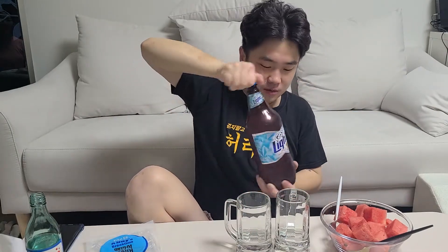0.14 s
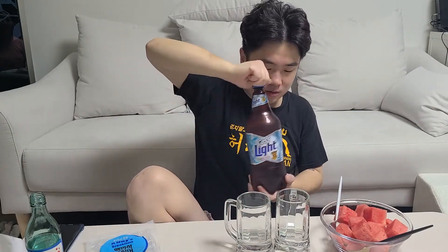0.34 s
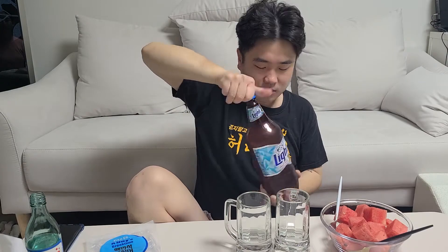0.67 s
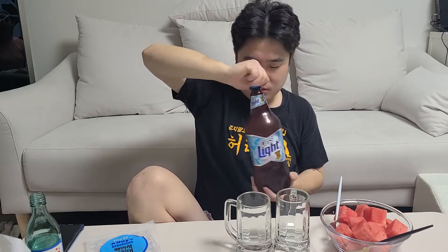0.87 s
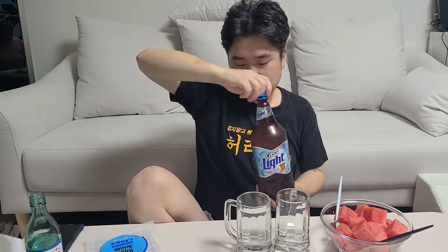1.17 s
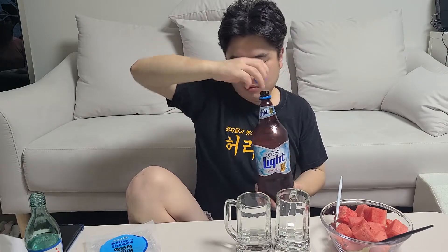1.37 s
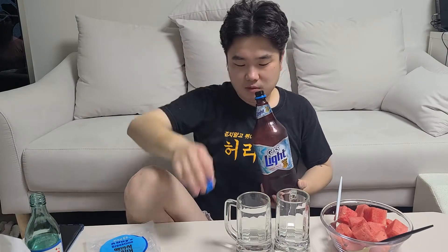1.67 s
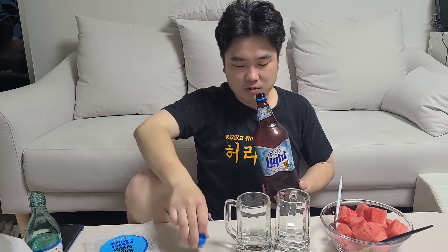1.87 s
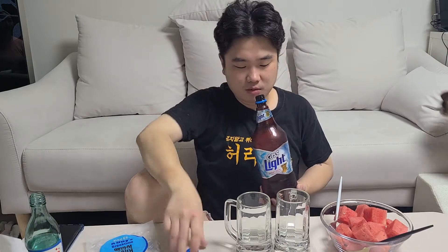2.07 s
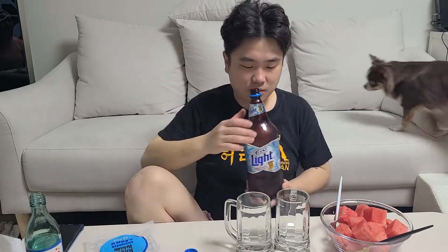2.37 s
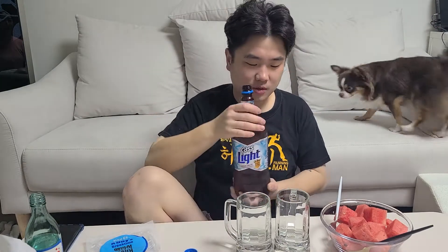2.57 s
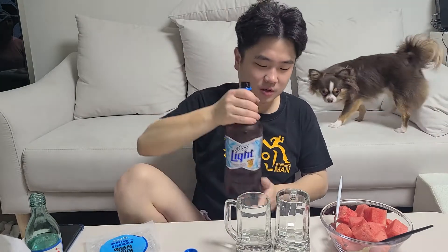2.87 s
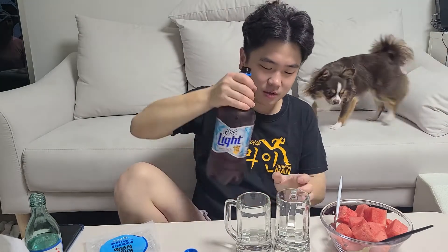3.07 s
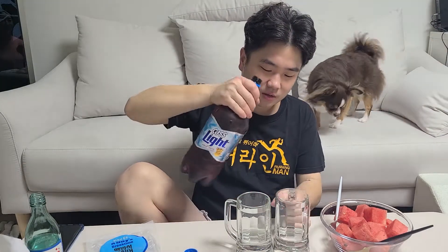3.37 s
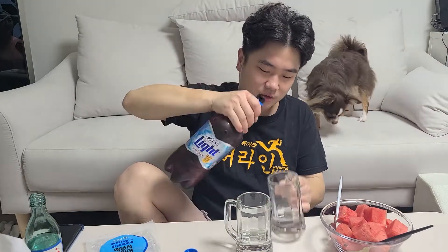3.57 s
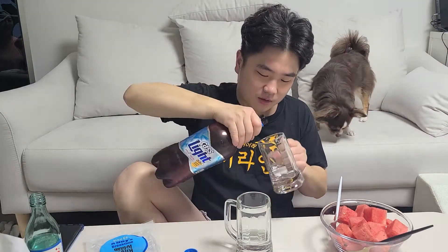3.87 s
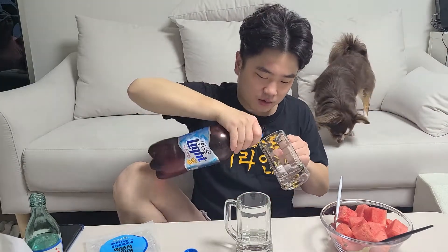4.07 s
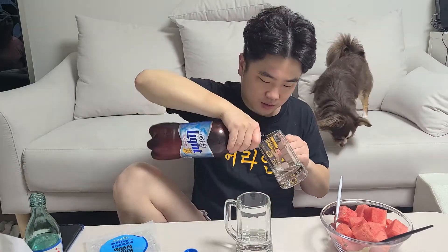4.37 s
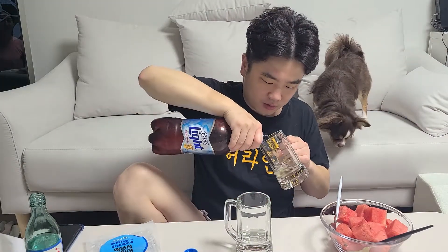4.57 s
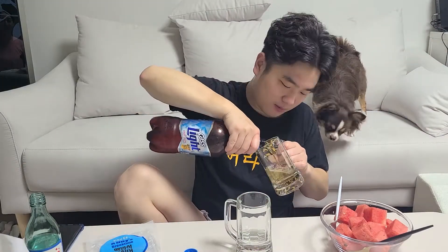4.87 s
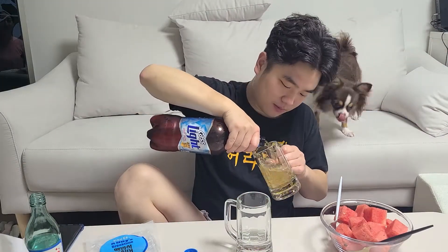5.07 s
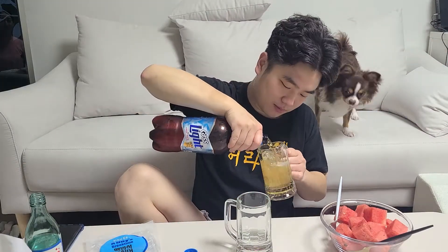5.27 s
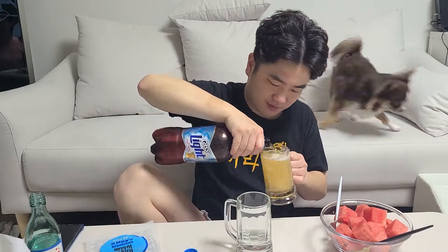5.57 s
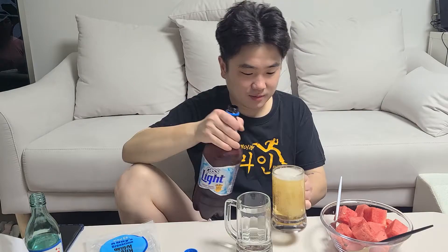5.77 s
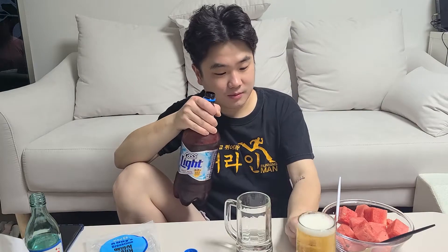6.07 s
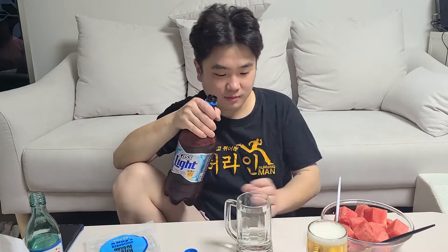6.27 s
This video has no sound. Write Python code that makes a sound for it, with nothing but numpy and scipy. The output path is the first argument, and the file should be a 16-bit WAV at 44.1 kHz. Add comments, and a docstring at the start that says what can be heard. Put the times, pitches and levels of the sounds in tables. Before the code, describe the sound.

Sharp gas hiss and pop from a plastic bottle, snapping ring, tumbling cap, quick fast-forward pouring, and a heavy glass set down in a living room.

```python
"""Gas leaks, pops and hisses as a big plastic beer bottle is twisted open: noise shaped by jet and thread gaps.
The seal and the dropped cap are clicks with a dense ring; beer plops, then runs down a tilted glass mug as
rising sine bubbles. The neck touches the mug, fingers rub, a body shifts on a sofa, and a mug is set down.
Ventilation noise and wavering tones hum behind it all. From the pour on, bubbles, body thuds, ventilation and
room echoes play in fast-forward."""
import sys
import numpy as np
from scipy import signal
from scipy.fft import rfft, irfft, next_fast_len
from scipy.io import wavfile
from scipy.ndimage import map_coordinates

SR = 44100
rng = np.random.default_rng(int(sys.argv[2]) if len(sys.argv) > 2 else 0)


def wav_out(sig):
    """Save sig, one row per channel (or a flat mono array), as 16-bit PCM at SR to the path in sys.argv[1]."""
    wavfile.write(sys.argv[1], SR, np.round(np.clip(np.atleast_2d(sig).T, -1, 1) * 32767).astype(np.int16))


N = 283563

FAST_S, SPEEDUP = 4.814, 4  # when fast-forward begins, and how many times faster it runs
TOP_HZ = 16050  # upper band limit

LEAK_S, POP_S = 0.13, 0.2148  # the seal starts to leak, then lets go
LEAK_DB, LEAK_GROWS_DB_PER_S, LEAK_ATTACK_S = -52, 224, 0.008  # the leak widens as the cap turns
JET_DB, JET_SAGS_DB_PER_S = -17, 80  # the full jet weakens as the pressure sinks
JET_HOLD_S, JET_FALLS_DB_PER_S = 0.052, 749.5  # then the pressure is spent: this much extra fall
SEEP_DB, SEEP_FALLS_DB_PER_S = -38, 112  # the last gas seeping through the thread


def gas_flow(t):
    """Flow in dB: a growing leak, then a jet that sags and collapses, and a slow seep with it and after it."""
    leaking = np.maximum(t - LEAK_S, 0)
    since_pop = t - POP_S
    leak = amp(LEAK_DB + LEAK_GROWS_DB_PER_S * leaking) * (1 - np.exp(-leaking / LEAK_ATTACK_S))
    collapse_db = JET_FALLS_DB_PER_S * np.maximum(since_pop - JET_HOLD_S, 0)
    jet = amp(JET_DB - JET_SAGS_DB_PER_S * since_pop - collapse_db)
    seep = amp(SEEP_DB - SEEP_FALLS_DB_PER_S * since_pop)
    return 20 * np.log10(np.where(since_pop < 0, leak, jet + seep) + 1e-9)


# colour of the rushing gas: [pitch_hz, relative level_db per Hz]
JET_COLOUR = [(240, -49.5), (400, -24.5), (865, -25.5), (964, -25), (1330, -20), (1650, -19.5), (2220, -14),
              (3420, -22), (4310, -11), (6740, -3.5), (7280, -12), (9040, -6.5), (11600, 0.5), (16000, -10)]
# resonances of the thread gaps: [pitch_hz, width_hz, relative level_db]
THREAD_GAPS = [(4800, 1380, -8.5), (7140, 206.4, -4.5), (7470, 450, -2.5), (11165, 280, -2.5),
               (11760, 200, -2.5), (14000, 360, -3)]


def gas_jet(whistle_db=-4, spit_db=2.5):
    """Turbulent rush plus whistling thread gaps, spitting at random around the flow of escaping gas."""
    out, t = np.zeros((2, N)), seconds(1)

    def gaps(hz):
        return sum(amp(db) * 1j * hz * width / (centre ** 2 - hz ** 2 + 1j * hz * width)
                   for centre, width, db in THREAD_GAPS)

    rush = filtered(rng.standard_normal(len(t)), lambda hz: amp(along(JET_COLOUR, hz)))
    whistle = filtered(rng.standard_normal(len(t)), gaps)
    hiss = unit(unit(rush) + amp(whistle_db) * unit(whistle))
    level_db = gas_flow(t) + spit_db * wobble(len(t), 400)
    add(out, 0, amp(level_db) * hiss, wet_db=3, near_db=2.0)
    return out * amp(np.array([[0.27], [-0.27]]))  # the jet points a little to the left


# colour of the seal letting go: [pitch_hz, relative level_db per Hz]
POP_COLOUR = [(30, -48.5), (100, -25.5), (200, -7.5), (300, 3), (600, -3.5), (850, -5.5), (1300, 0),
              (4000, -2.5), (9000, -10.5), (16000, -19.5)]
# air modes in the bottle: [pitch_hz, relative level_db, t60_s]
BOTTLE_AIR = [(301, -1.5, 0.12), (390, -7, 0.098), (546, -3.5, 0.064), (1070, 0, 0.04), (2368, -5, 0.087)]


def seal_pop(pop_db=-22, neck_db=-29.0):
    """The seal bursts as a sharp click and sets the air in the bottle ringing."""
    out = np.zeros((2, N))
    add(out, POP_S, amp(pop_db) * click(POP_COLOUR, rattle=0.88, t60=0.014), wet_db=-2.5, near_db=-4.5)
    add(out, POP_S, amp(neck_db) * ringing(BOTTLE_AIR), wet_db=-15.5, near_db=-2.5)
    return out


# the cap's ring snaps: [start_s, level_db, brightness_db per octave]
RING_SNAPS = [(.7283, -23, 5)]
# colour of the snapping ring before tilt: [pitch_hz, relative level_db per Hz]
RING_COLOUR = [(100, -34), (300, -7.5), (800, -6), (1150, 1.5), (1900, -6), (3000, -1.5), (5000, -16),
               (6200, -16.5), (8000, -27), (11000, -29), (16000, -36)]


def seal_snap():
    """The plastic ring breaks in a bright crack with a weaker, duller echo contact."""
    return contacts(RING_SNAPS, RING_COLOUR, rattle=0.88, t60=0.015, wet_db=-2.5, left_lag=4,
                    gap_s=0.0012, loss_db=9.5, dull_db=8, count=2)


# the cap lands and tumbles on the table: [start_s, level_db, brightness_db per octave]
CAP_DROPS = [(1.9518, -25, 2.5), (1.9635, -27.5, 3.5), (2.030, -37, -4.5), (2.0378, -35.5, 0),
             (2.0815, -43, -5.5), (2.095, -40, -3.5)]
# colour of the cap before tilt: [pitch_hz, relative level_db per Hz]
CAP_COLOUR = [(200, -34), (500, -9.5), (700, -12.5), (950, -3), (1300, -6), (2400, 2), (3200, -3.5),
              (4500, 0.5), (6500, -9.5), (9000, -15.5), (11500, -16.5), (16000, -31)]


def cap_drop():
    """The light cap strikes the table again and again, chattering at each landing."""
    return contacts(CAP_DROPS, CAP_COLOUR, rattle=0.52, t60=0.013, wet_db=-2.5, left_lag=1,
                    gap_s=0.0105, loss_db=8, dull_db=5.5, count=3)


def contacts(rows, spectrum, rattle, t60, wet_db, left_lag, gap_s, loss_db, dull_db, count):
    """Blows on one body; each chatters in count contacts, gap_s apart, every one weaker and duller."""
    out = np.zeros((2, N))
    for start_s, level_db, brightness in rows:
        for k in range(count):
            tilt = brightness - k * dull_db  # dB per octave around 3 kHz
            colour = [(hz, level + tilt * np.log2(hz / 3000)) for hz, level in spectrum]
            hit = amp(level_db - k * loss_db) * click(colour, rattle, t60)
            add(out, start_s + k * gap_s, hit, wet_db, near_db=-4.5, left_lag=left_lag)
    return out


# the beer sloshes and frees air bubbles: [start_s, level_db before plop_db, pitch_hz at normal speed]
SLOSHES = [(0.016, -32, 1120), (0.068, -37.5, 1210), (1.336, -42, 1156), (1.888, -36.5, 1185),
           (2.182, -42.5, 1210), (2.526, -34.5, 1020), (4.017, -37.5, 1024), (4.535, -38, 1282),
           (5.2091, -32, 1150), (5.944, -27, 1130), (5.991, -26, 1240), (6.093, -34, 1100),
           (6.2, -27, 1170)]


def sloshes(plop_db=-4, gap_s=0.002, count=6):
    """Each slosh frees a quick cluster of bubbles, in random order of size around its main pitch."""
    out = np.zeros((2, N))
    for start_s, level_db, pitch_hz in SLOSHES:
        speed = speed_at(start_s)
        cluster = np.zeros(SR // 4)
        for k, detune in enumerate(rng.permutation(np.linspace(-0.2, 0.2, count))):
            plop = bubble(pitch_hz * speed * np.exp(detune), speed, life=0.022, rise=3.985)
            first = round(k * gap_s / speed * SR)
            cluster[first:first + len(plop)] += amp(level_db + plop_db - k) * plop  # 1 dB weaker each time
        add(out, start_s, cluster, wet_db=1)
    return out


# the first beer to land traps two large bubbles: [start_s, level_db, pitch_hz at normal speed]
LARGE_BUBBLES = [(4.866, -33, 796), (4.89, -39, 890)]


def stream(length_s=0.8, bubble_db=-47, pitch_hz=1100, spread=0.5, scatter_db=2, count=110):
    """Two gulps, and beer sliding down the tilted mug, folding in small bubbles of many sizes."""
    out, trickle = np.zeros((2, N)), np.zeros(2 * SR)
    for start_s, level_db, gulp_hz in LARGE_BUBBLES:
        gulp = bubble(gulp_hz * SPEEDUP, SPEEDUP, life=0.096, rise=2.5)
        add(out, start_s, amp(level_db) * gulp, wet_db=4)
    starts = rng.uniform(0, length_s, count)
    for start_s, (size, strength) in zip(starts, rng.standard_normal((count, 2))):
        fast_hz = min(pitch_hz * np.exp(spread * size) * SPEEDUP, TOP_HZ)
        plop = bubble(fast_hz, SPEEDUP, life=0.02, rise=4)
        first = round(start_s * SR)
        level_db = bubble_db + scatter_db * np.clip(strength, -2, 2)
        trickle[first:first + len(plop)] += amp(level_db) * plop
    add(out, FAST_S, trickle, wet_db=8.5)
    return out


def bubble(hz, speed, life, rise):
    """A sine swells softly, climbs by 2 * rise of hz per second and falls 60 dB in life (normal-speed time)."""
    t = seconds(life * 2 / speed) * speed
    envelope = amp(-60 * t / life) * (1 - np.exp(-t / 0.0015))
    return envelope * np.sin(2 * np.pi * hz / speed * t * (1 + rise * (t - life / 4)))


# the bottle neck touches the mug: [start_s, knock level_db, ring level_db]
NECK_TOUCHES = [(4.2983, -40, -71), (4.5656, -49, -45), (4.5962, -40.5, -52)]
# colour of the knock: [pitch_hz, relative level_db per Hz]
KNOCK_COLOUR = [(400, 2), (1000, -8), (1800, 12), (2400, -8), (3000, 2.5), (4000, -21), (7500, -22.5),
                (8600, -14.5), (9500, -35), (16000, -36)]
# modes of the glass: [pitch_hz, relative level_db, t60_s]
GLASS_MODES = [(3170, 5, 0.066), (3300, -15, 0.052), (8500, -22, .04)]


def mug_rim():
    """The plastic neck gives a dull knock and makes the glass ring."""
    out = np.zeros((2, N))
    for start_s, knock_db, ring_db in NECK_TOUCHES:
        add(out, start_s, amp(knock_db) * click(KNOCK_COLOUR, rattle=0.92, t60=0.014), wet_db=-1)
        add(out, start_s, amp(ring_db) * ringing(GLASS_MODES), wet_db=-5.0)
    return out


# the full mug is set down and rocks: [start_s, level_db, brightness_db per octave]
MUG_KNOCKS = [(6.0373, -26, 1), (6.0396, -28.5, 1.5), (6.064, -37.5, -1), (6.1246, -37.5, 2),
              (6.128, -39.5, -1)]
# colour of mug on table before tilt: [pitch_hz, relative level_db per Hz]
TABLE_COLOUR = [(240, -40), (450, -15), (700, -0.5), (1000, -17.5), (1400, -2.5), (2100, -2), (2900, -7),
                (3300, -11), (4600, -15), (7400, -27), (11000, -34), (16000, -45)]


def mug_set_down():
    """The heavy mug knocks on the table, each blow followed by a weaker, duller contact."""
    return contacts(MUG_KNOCKS, TABLE_COLOUR, rattle=0.81, t60=0.0094, wet_db=6.0, left_lag=1,
                    gap_s=0.004, loss_db=8, dull_db=5.5, count=2)


# light ticks of the thread and of the bottle's flexing wall, and two more ticks during the pour: [start_s,
# level_db, centre pitch_hz]
LIGHT_TICKS = [(0.9317, -52, 3800), (1.0804, -45, 2100), (1.199, -50.5, 2450), (1.396, -61, 12500),
               (1.4626, -47, 8000), (1.7365, -47.5, 7300), (5.08, -48, 3200), (5.294, -43, 5800)]


def light_ticks(t60=0.027, octaves=0.39):
    """Each tick is a short burst of banded noise, which dies sooner in fast-forward."""
    out, t = np.zeros((2, N)), seconds(0.03)
    for start_s, level_db, centre_hz in LIGHT_TICKS:
        noise = filtered(rng.standard_normal(len(t)), lambda hz: band(hz, centre_hz, octaves))
        decay = amp(-60 * t * np.sqrt(speed_at(start_s)) / t60)
        add(out, start_s, amp(level_db) * blow(noise * decay), wet_db=-4)
    return out


# thread and fingers rub on plastic and glass; the low strokes after 5.6 s are a body's rustle
# in fast-forward: [start_s, length_s, level_db, centre pitch_hz]
RUBS_AND_RUSTLES = [(1.392, 0.044, -66, 11000), (1.465, .028, -56, 8300), (1.572, 0.065, -61.5, 7500),
                    (1.716, .042, -65, 10000), (2.561, 0.074, -64.5, 6940), (3.116, 0.033, -64, 7500),
                    (3.79, .04, -68, 3900), (3.978, 0.043, -74, 7500), (4.726, 0.027, -64.5, 7700),
                    (5.692, .022, -49, 1200), (5.756, 0.019, -46, 7900), (5.763, .02, -45.5, 750),
                    (6.386, .053, -53.5, 7000)]


def rubs_and_rustles(octaves=1.0):
    """Friction of thread and fingers, and of a rustling body, gives short, grainy strokes of banded noise."""
    out = np.zeros((2, N))
    for start_s, length_s, level_db, centre_hz in RUBS_AND_RUSTLES:
        rub = stroke(length_s, lambda hz: band(hz, centre_hz, octaves), grain_db=5)
        add(out, start_s, amp(level_db) * rub, wet_db=0)
    return out


# colour of the mug's base on the table top: [pitch_hz, relative level_db per Hz]
SCRAPE_COLOUR = [(200, -10), (700, 6), (1200, 1), (2000, -3), (3700, -3), (6500, -6.5), (9000, -23),
                 (16000, -25)]


def mug_slide(start_s=3.325, length_s=0.11, level_db=-52):
    """The empty mug is dragged off the table in one grainy scrape."""
    out = np.zeros((2, N))
    scrape = stroke(length_s, lambda hz: amp(along(SCRAPE_COLOUR, hz)), grain_db=4.0)
    add(out, start_s, amp(level_db) * scrape, wet_db=-4.5)
    return out


def stroke(length, colour, grain_db):
    """Grainy friction that swells and fades over its length."""
    t = seconds(length)
    slips = rng.standard_normal(len(t)) * amp(grain_db * wobble(len(t), 249))
    return unit(filtered(slips, colour)) * np.sin(np.pi * t / length)


BUMP_HZ, CLOTH_HZ, CLOTH_OCTAVES = 49.2, 110, 1.16  # frame's thud and cloth's rustle, at normal speed
# the body shifts against the sofa: [middle_s, level_db]
BODY_SHIFTS = [(1.821, -50), (2.6, -51), (2.93, -45.5), (3.29, -48.5), (3.38, -51), (5.582, -45),
               (5.657, -44.5), (5.705, -47), (5.767, -50.5), (6.34, -47.5)]


def sofa(bump_s=0.12, cloth_db=-5):
    """Each shift of the body gives a soft low thud and a dull rustle of cloth."""
    out = np.zeros((2, N))
    for middle_s, level_db in BODY_SHIFTS:
        speed = speed_at(middle_s)
        length = bump_s / speed
        t = seconds(length)
        thud = np.sin(np.pi * t / length) ** 2 * np.sin(2 * np.pi * BUMP_HZ * speed * t)
        cloth = stroke(length, lambda hz: band(hz, CLOTH_HZ * speed, CLOTH_OCTAVES), grain_db=2.5)
        bump = amp(level_db) * (thud + amp(cloth_db) * cloth)
        add(out, middle_s - length / 2, bump, wet_db=-11.5, near_db=-9)
    return out


FAN_HZ = 108.6  # before fast-forward
POUR_FAN_DB = -43.5  # the fan's level from the pour on, before fan_db
# level of the fan's hum: [time_s, level_db before fan_db]
FAN_SWELL = [(0.0, -47), (0.13, -49), (0.69, -43), (0.72, -47.5), (2.02, -42.5), (2.22, -55), (2.26, -43),
             (3.18, -41), (3.22, -53), (3.45, -43.5), (4.44, -44), (4.52, -57), (4.56, -45.5), (4.8, -41.5)]
# ventilation hiss: [pitch_hz, relative level_db per Hz]
AIR_COLOUR = [(180, -8.5), (300, -5), (640, -2.5), (800, -8), (2000, -7.5), (2500, -17), (3400, -24),
              (4200, -27.5), (5700, -33), (7200, -26.5), (9000, -42.5), (10800, -41.5), (12000, -34.5),
              (16000, -40)]
# its low rumble: [pitch_hz, relative level_db per Hz]
DRONE_COLOUR = [(20, -24), (35, -24), (48, -10), (70, -16.5), (95, -3), (125, -2), (160, -6), (200, -12),
                (240, -8), (285, -20.5), (450, -30), (900, -58)]
# faint appliance tones: [pitch_hz before fast-forward, level_db, wander rate in knots per s]
APPLIANCE_TONES = [(602, -66.5, 6), (3090, -85.5, 12), (11640, -87.5, 98), (14670, -92.5, 90)]


def ventilation(air_db=-53, drone_db=-49.5, fan_db=-3.0):
    """Steady air noise and wavering hum; fast-forward lifts all of it by two octaves."""
    cut = round(FAST_S * SR)
    n = cut + SPEEDUP * (N - cut)  # long enough to be sped up afterwards
    hum = amp(air_db) * diffuse(n, AIR_COLOUR) + amp(drone_db) * diffuse(n, DRONE_COLOUR)
    times, levels_db = np.transpose(FAN_SWELL)
    swell_db = np.interp(np.arange(n) / SR, times, levels_db, right=POUR_FAN_DB)
    hum += amp(fan_db + swell_db) * tone(n, FAN_HZ, 5, waver_db=1.2, drift=0.35)
    for pitch_hz, level_db, rate in APPLIANCE_TONES:
        hum += amp(level_db) * tone(n, pitch_hz, rate, waver_db=4, drift=0.7)
    fast = signal.resample_poly(hum[:, cut:], 1, SPEEDUP, axis=1)
    return np.hstack([hum[:, :cut], fast])


def tone(n, hz, rate, waver_db, drift):
    """A line of rms 1 whose phase wanders (drift in radians), and its level twice as quickly."""
    level = amp(waver_db * wobble(n, 2 * rate))
    return unit(level * np.sin(2 * np.pi * hz * np.arange(n) / SR + drift * wobble(n, rate)))


# left-right likeness of diffuse sound: [pitch_hz, correlation]
STEREO_LIKENESS = [(60, 0.9), (130, 0.97), (290, 0.91), (640, 0.29), (1410, -0.089), (3100, 0.28),
                   (6820, -0.037), (15000, -0.052)]


def diffuse(n, spectrum):
    """Coloured stereo noise of rms 1, most alike on both sides in the bass."""
    def mid_side(hz):
        turn = np.arccos(np.clip(along(STEREO_LIKENESS, hz), -1, 1)) / 2
        low_cut = hz ** 2 / (hz ** 2 + 18 ** 2)
        return low_cut * amp(along(spectrum, hz)) * [np.cos(turn), np.sin(turn)]

    mid, side = filtered(rng.standard_normal((2, n)), mid_side)
    return unit(np.array([mid + side, mid - side]))


# decay of the room: [pitch_hz, t60_s at normal speed]
WALL_DECAY = [(200, 0.3), (800, .27), (2100, 0.28), (5500, 0.35), (10000, 0.27), (16000, .24)]


def room(speed, wet_db, near_db, left_lag):
    """Direct sound (left_lag samples later on the left), scatter from hands and table, then the walls."""
    flat = [(100, 0.0031), (16000, 0.0079)]
    hz, t, z = signal.stft(diffuse(SR // 3, flat), SR, nperseg=256)
    decay = amp(-60 * t / along(WALL_DECAY, hz)[:, None])
    tail = signal.istft(z * decay, SR, nperseg=256)[1]
    t = np.arange(tail.shape[1]) / SR
    tail *= 1 - np.exp(-(t / 0.004) ** 2)  # wall echoes build up over some milliseconds
    near = rng.standard_normal(tail.shape) * amp(-60 * t / 0.012)
    far = amp(wet_db) * tail / np.linalg.norm(tail[0]) + amp(near_db) * near / np.linalg.norm(near[0])
    response = signal.resample_poly(far, 1, speed, axis=1) * np.sqrt(speed)  # fast-forward shortens echoes
    response[[0, 1], [left_lag, 0]] += 1
    return response / np.sqrt(1 + amp(near_db) ** 2)


def add(out, start_s, sound, wet_db, near_db=-5, left_lag=3):
    """Let a sound happen in the room at start_s, its direct part left_lag samples later on the left."""
    start = round(start_s * SR)
    response = room(speed_at(start_s), wet_db, near_db, left_lag)
    heard = signal.fftconvolve(sound[None], response, axes=1)[:, :N - start]
    out[:, start:start + heard.shape[1]] += heard


def click(spectrum, rattle, t60, size=4096):
    """A sharp contact and its dense, short ring, coloured by the struck body."""
    gain = amp(along(spectrum, np.fft.rfftfreq(size, 1 / SR)))
    cepstrum = irfft(np.log(np.maximum(gain, 1e-4)))
    cepstrum[1:size // 2] *= 2  # folding the cepstrum gives minimum phase: the energy comes first
    cepstrum[size // 2 + 1:] = 0
    body = irfft(np.exp(rfft(cepstrum)))
    ring = rng.standard_normal(size) * amp(-60 * np.arange(size) / SR / t60)
    return blow(blow(body) + rattle * blow(signal.fftconvolve(body, ring)[:size]))


def ringing(modes):
    """Damped modes, struck a little differently each time."""
    t = seconds(0.5)
    return sum(amp(db + rng.normal(0, 1.2) - 60 * t / t60) * np.cos(2 * np.pi * hz * t)
               for hz, db, t60 in modes)


def wobble(n, rate):
    """A smooth random curve, rate knots a second."""
    knots = rng.standard_normal(int(n * rate / SR) + 4)
    coarse = np.arange(0, n + 64, 64)
    return np.interp(np.arange(n), coarse, map_coordinates(knots, [coarse * rate / SR]))


def filtered(x, response):
    """x times a response of frequency."""
    n = x.shape[-1]
    m = next_fast_len(n + 8192, True)
    return irfft(rfft(x, m) * response(np.fft.rfftfreq(m, 1 / SR)), m)[..., :n]


def band(hz, centre, octaves):
    """Gain of a bell-shaped band, octaves being its standard deviation."""
    return np.exp(-(np.log2((hz + 1) / centre) / octaves) ** 2 / 2)


def along(points, hz):
    """Interpolate (Hz, value) points on a log axis."""
    f, v = np.transpose(points)
    return np.interp(np.log(hz + 1), np.log(f + 1), v)


def amp(db):
    """Decibels to gain."""
    return 10 ** (np.asarray(db) / 20)


def unit(x):
    """Scale to rms 1."""
    return x / np.sqrt(np.mean(x ** 2) + 1e-20)


def blow(x):
    """Scale a transient to the energy of 3 ms at rms 1."""
    return x * np.sqrt(0.003 * SR / np.sum(x ** 2))


def seconds(length):
    """A time axis."""
    return np.arange(int(length * SR)) / SR


def speed_at(s):
    """Playback speed at a moment."""
    return SPEEDUP if s >= FAST_S else 1


def scene():
    """Opening, dropping the cap, pouring and setting the mug down, over handling and ventilation."""
    opening = gas_jet() + seal_pop() + seal_snap() + cap_drop()
    beer = sloshes() + stream()
    mug = mug_rim() + mug_set_down() + mug_slide()
    handling = light_ticks() + rubs_and_rustles()
    return opening + beer + mug + handling + sofa() + ventilation()


def record(dry):
    """A steep low-pass leaves almost nothing above the band limit."""
    return filtered(dry, lambda hz: 1 / np.sqrt(1 + (hz / TOP_HZ) ** 160))


dry = scene()
out = record(dry)
wav_out(out)
```